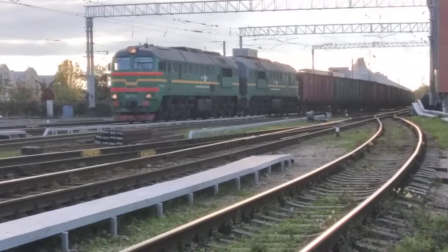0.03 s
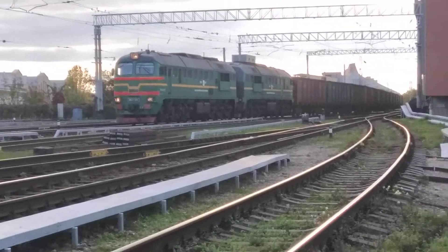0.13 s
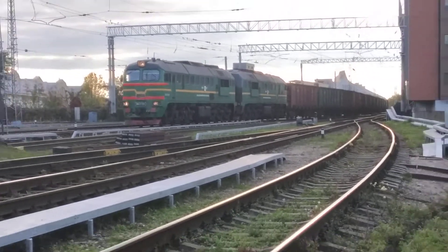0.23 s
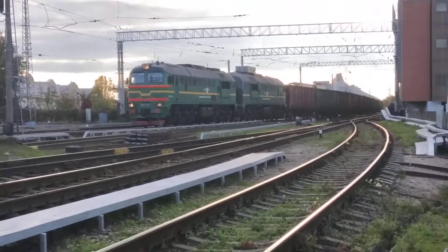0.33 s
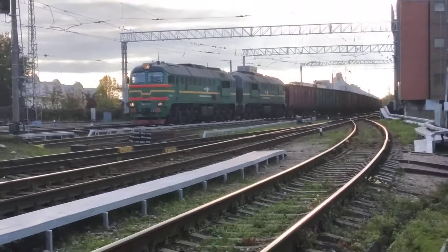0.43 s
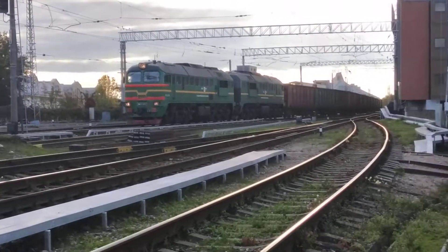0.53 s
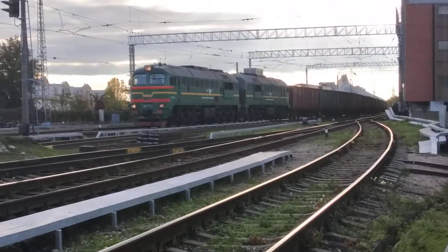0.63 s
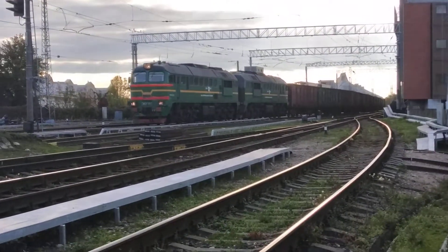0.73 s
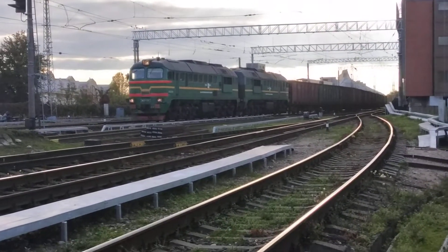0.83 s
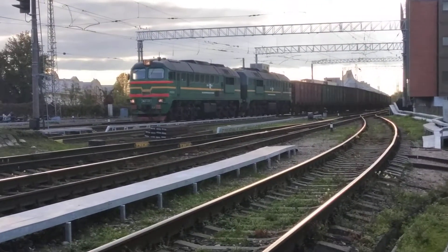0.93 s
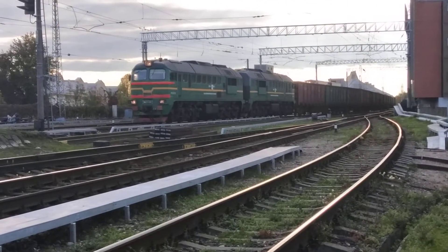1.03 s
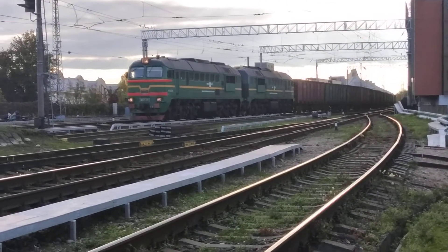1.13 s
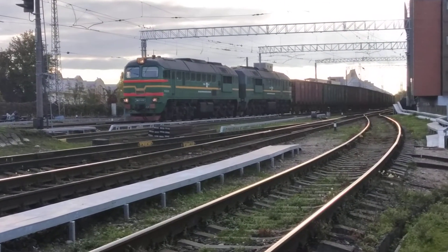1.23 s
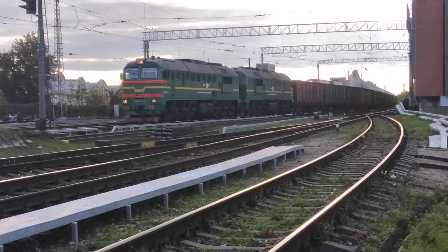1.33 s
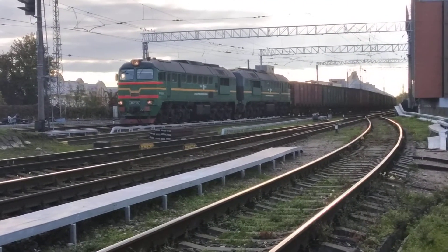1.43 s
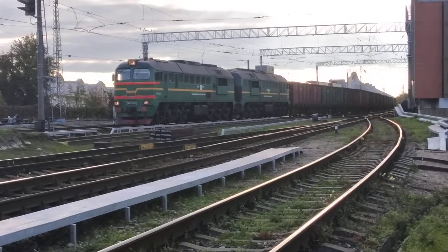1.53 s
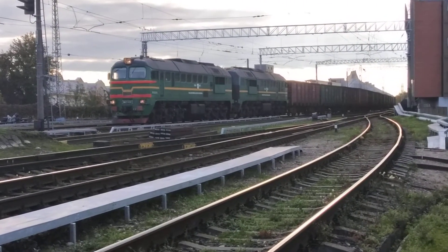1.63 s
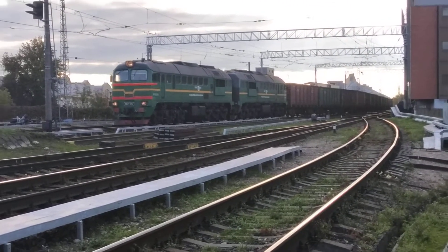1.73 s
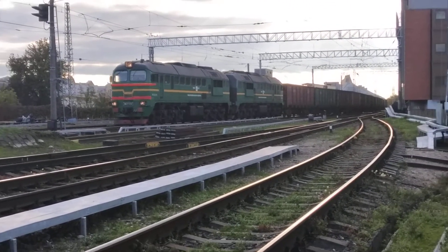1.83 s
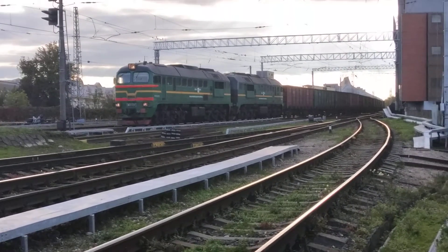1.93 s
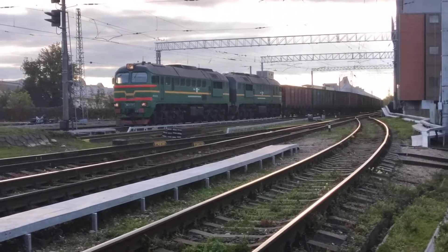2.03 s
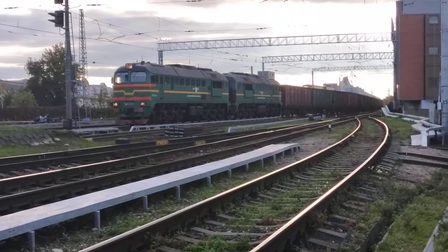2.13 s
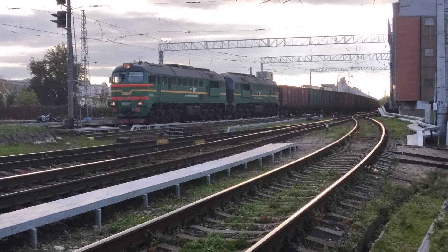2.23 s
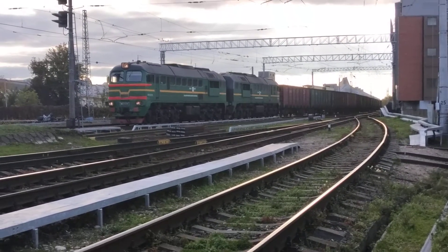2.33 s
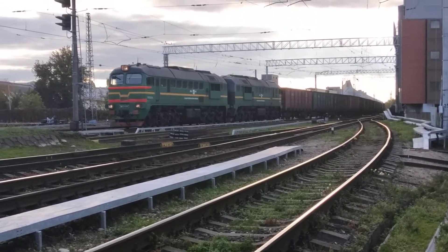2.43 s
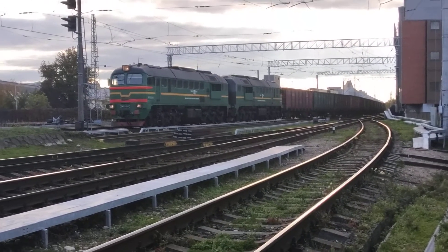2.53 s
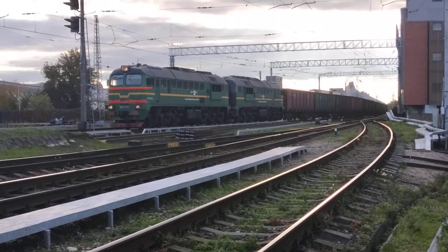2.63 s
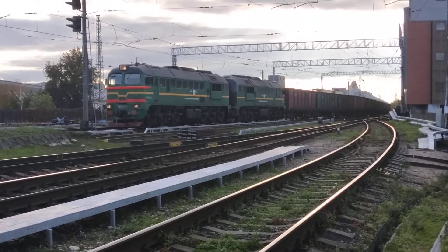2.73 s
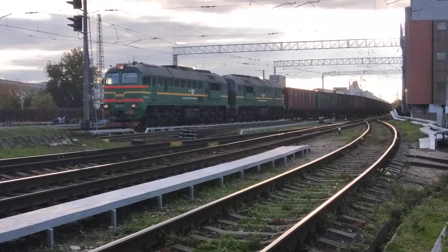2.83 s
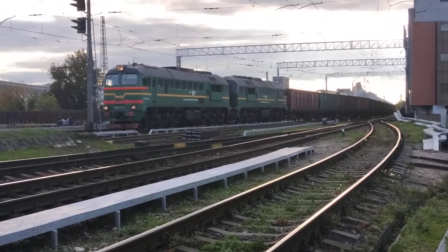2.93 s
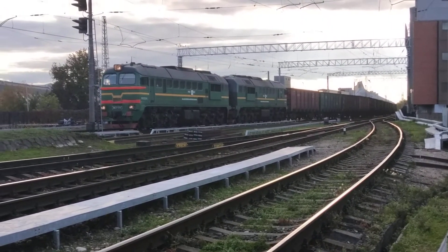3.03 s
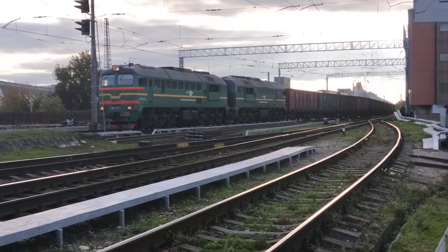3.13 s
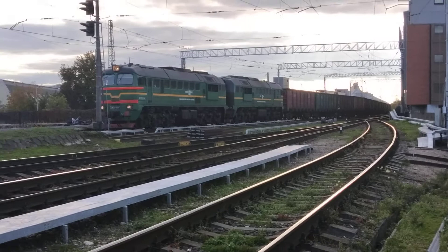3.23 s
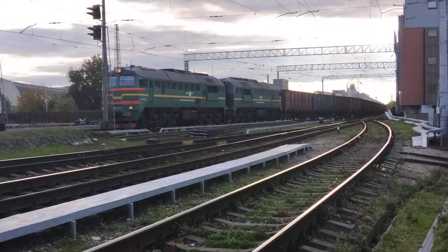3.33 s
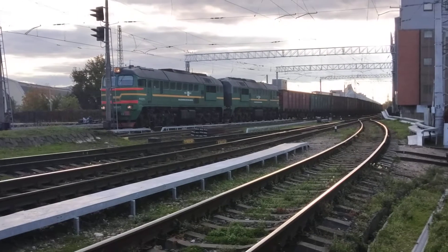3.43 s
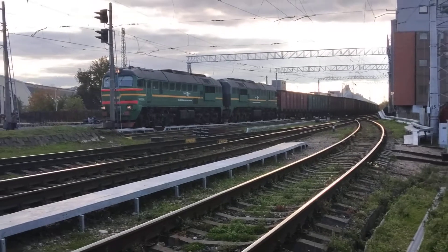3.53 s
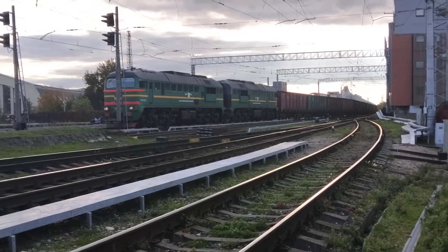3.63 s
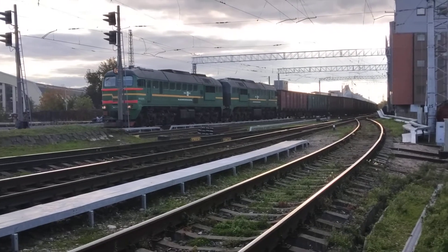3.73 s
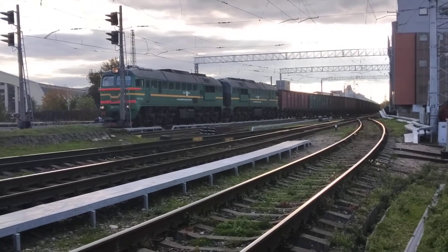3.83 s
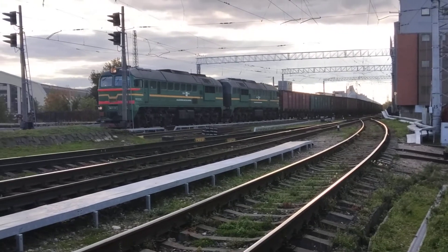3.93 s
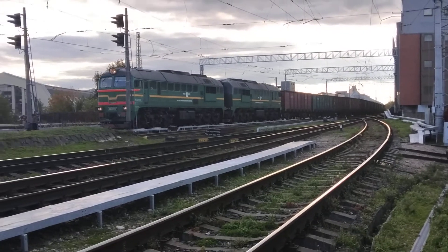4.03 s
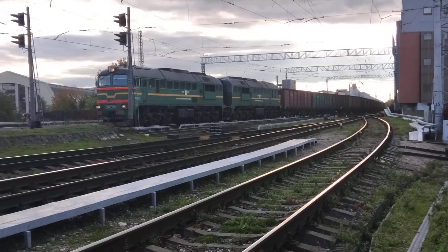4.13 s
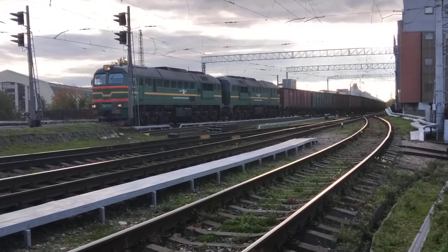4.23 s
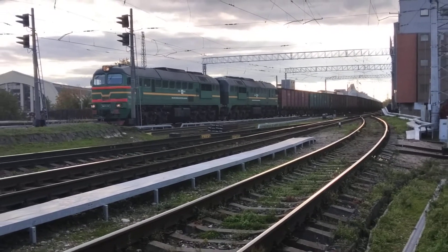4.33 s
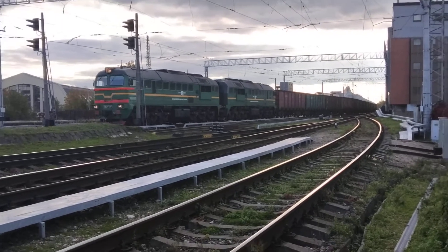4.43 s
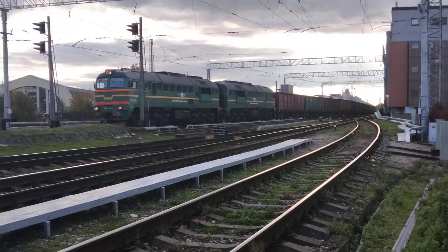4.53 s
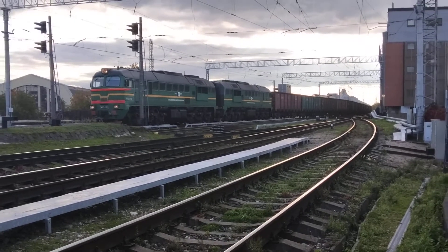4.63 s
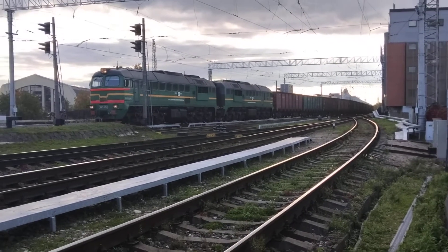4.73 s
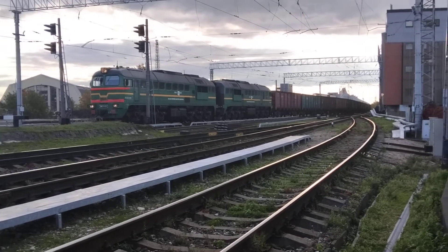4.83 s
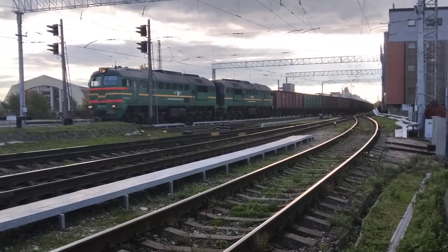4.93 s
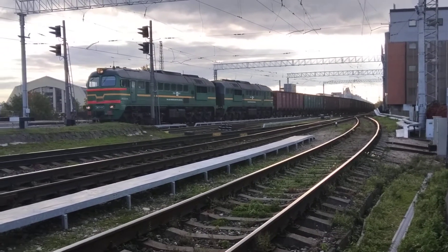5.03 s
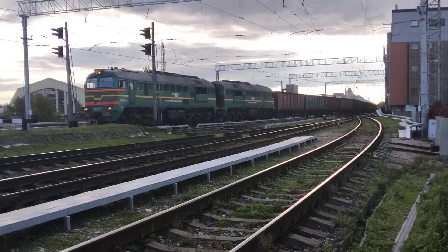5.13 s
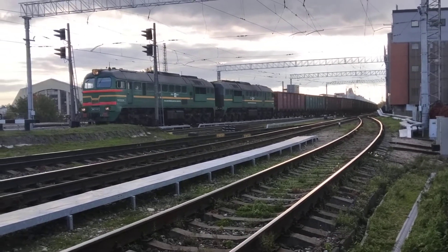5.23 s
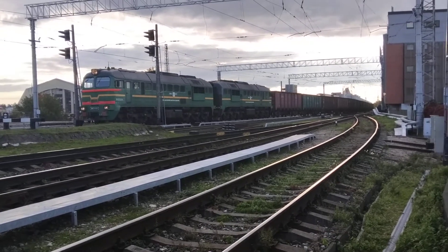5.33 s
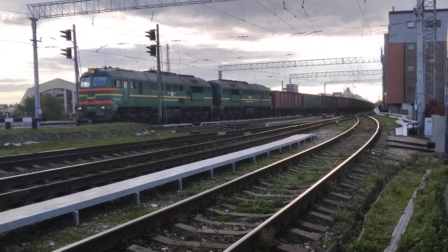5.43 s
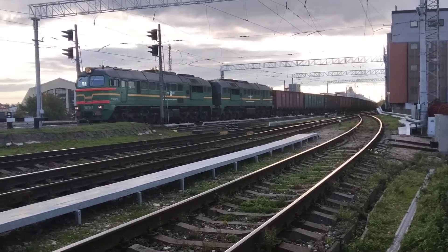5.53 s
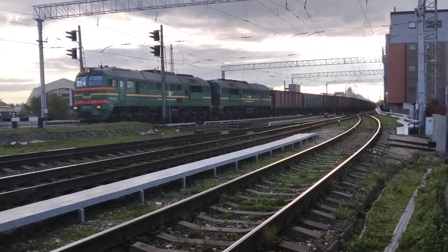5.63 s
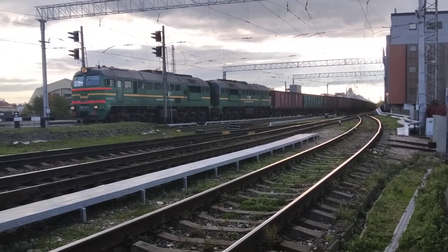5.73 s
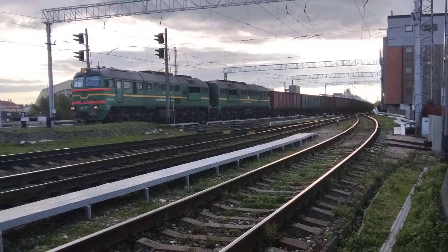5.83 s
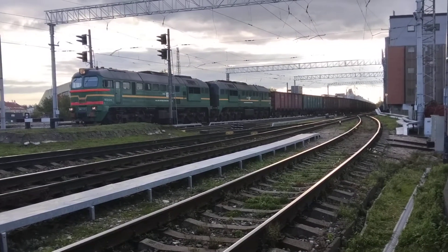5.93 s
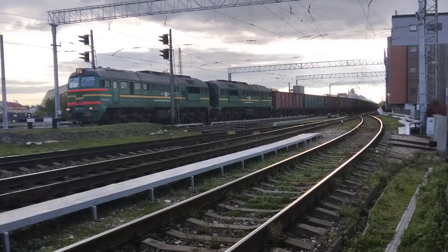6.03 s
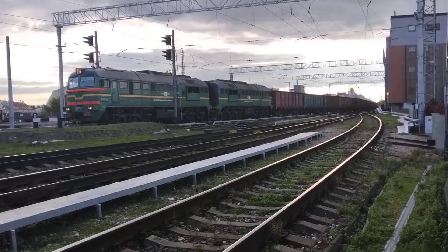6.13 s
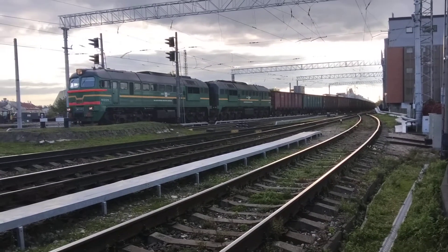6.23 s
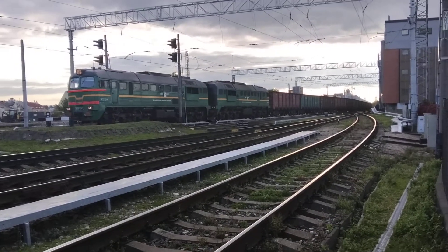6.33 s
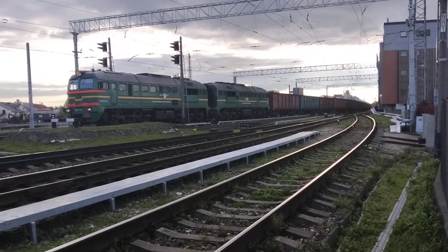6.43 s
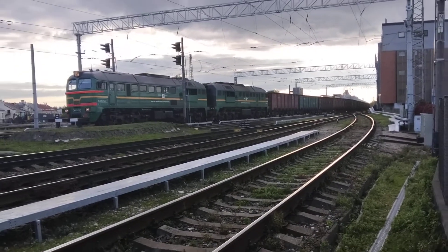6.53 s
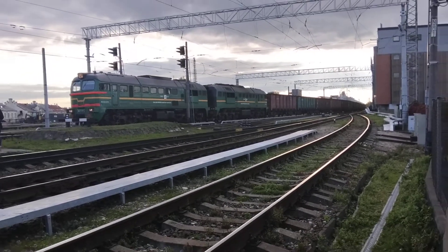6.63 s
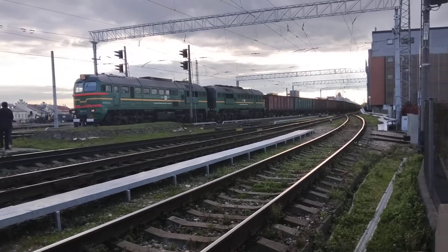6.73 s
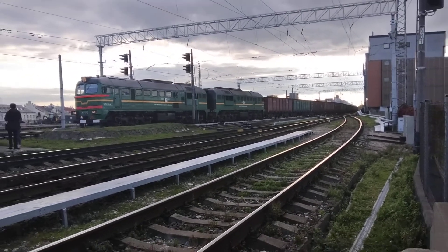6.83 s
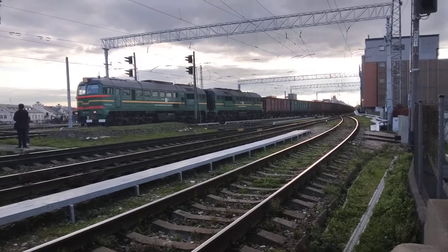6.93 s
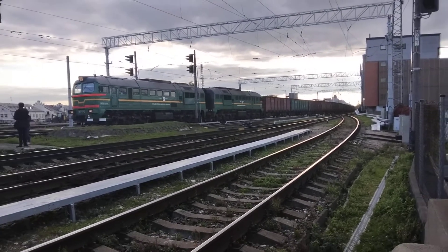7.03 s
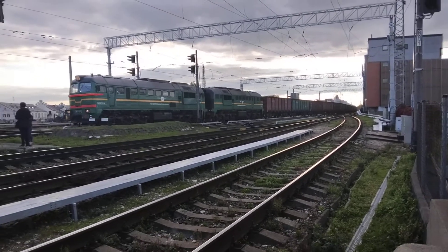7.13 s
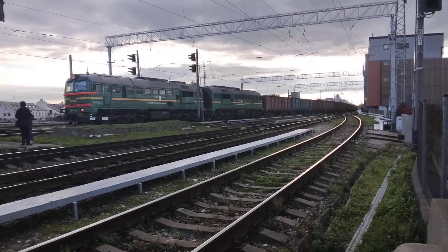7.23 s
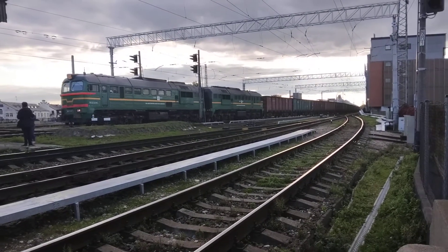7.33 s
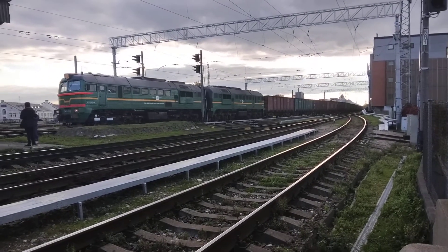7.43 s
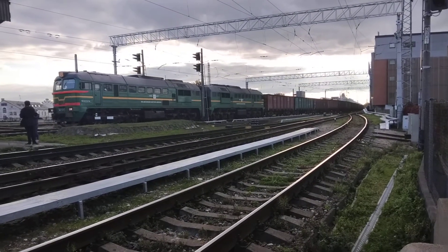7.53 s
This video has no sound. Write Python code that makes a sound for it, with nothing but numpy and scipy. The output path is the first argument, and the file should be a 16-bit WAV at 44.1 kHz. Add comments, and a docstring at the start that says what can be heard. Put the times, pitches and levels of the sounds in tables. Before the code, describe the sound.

A heavy diesel locomotive in two sections rolls slowly closer through an open station yard, heard from beside the track in stereo. From 0 s a very deep, lumpy exhaust throb is already present, roughly seven cycles a second with many blows in each; the front engine hunts gently in speed against the steady rear, making a slow beating. Under it are low wheel rumble, a soft mid roar, faint hums and a wavering gear whine around 770 Hz. Small clanks and steel rattles from joints and couplings scatter throughout, beginning near 0.4 s. A brief flange squeak sounds at 1.9 s. From 3 s the throb is clearly fuller, with a stronger clatter at 4.3 s. Thin faint squeals pass around 5.2-5.7 s, a tiny air puff at 6.4 s, a sharp clatter at 6.7 s, and dull thuds near 7.5 s. The front engine is loudest at the 7.6 s cut.

```python
"""Two twelve-cylinder engines throb through their exhausts as a two-section diesel locomotive nears with wagons.
It rolls slowly across a station yard; the front engine hunts in speed, the rear runs even, so they beat.
Exhaust: cylinder pulses into pipe resonances. Gear whine, hums, squeak, squeals: wavering sines.
Rolling, clatter, thuds, air puff: coloured stereo noise, in bursts for the jolts and the puff."""
import sys
import numpy as np
from scipy import signal
from scipy.fft import rfft, irfft
from scipy.io import wavfile

SR = 44100
rng = np.random.default_rng(int(sys.argv[2]) if len(sys.argv) > 2 else 0)


def log_audio(samples):
    """Write samples as a 16-bit WAV file to the path given in sys.argv[1]."""
    # one column per channel
    frames = np.atleast_2d(samples).T
    # limit to full scale, then quantise
    limited = np.clip(frames, -1, 1)
    pcm = np.round(limited * 32767).astype(np.int16)
    wavfile.write(sys.argv[1], SR, pcm)


N = 335160
TIME = np.arange(N) / SR
RUN_IN_SAMPLES = SR // 2

# Front crank speed, hunting: time_s, speed_turns_per_s
FRONT_SPEED = [(0, 6.8386), (0.391, 6.5679), (1.398, 6.9781), (2.052, 6.6063), (3.116, 6.944),
               (3.779, 6.6304), (4.864, 6.8922), (5.775, 6.7394), (6.888, 6.8763), (7.6, 6.7442)]
# Rear crank speed, sagging evenly: time_s, speed_turns_per_s
REAR_SPEED = [(0, 6.7307), (7.6, 6.6957)]
# Front cylinder blows leaving the manifold: crank_angle_deg, relative_strength_db
FRONT_BLOWS = [(13.6, 2.9), (49.0, 4.9), (62.9, 1.7), (101.5, 4.6), (128.7, 4.5), (161.3, 7.9),
               (191.3, 9.4), (224.8, 12.3), (253.7, 5.2), (262.1, -3.9), (289.8, 5.5), (341.0, 6.3)]
# Rear cylinder blows leaving the manifold: crank_angle_deg, relative_strength_db
REAR_BLOWS = [(28.8, -1.3), (45.6, -10.2), (68.5, -10.6), (97.4, -0.6), (105.2, -11.4), (142.0, -5.0),
              (164.4, -7.6), (218.5, -0.8), (251.3, -4.5), (270.8, 0.0), (287.2, -5.1), (324.1, -5.3)]
# Exhaust pipe resonances: centre_hz, width_hz, relative_gain_db
PIPE_RESONANCES = [(14.8, 19.2, 38.6), (63.2, 8.6, 36.9), (94.0, 8.3, 33.0), (119.2, 12.3, 28.4)]
# Nearness of the engines: time_s, front_relative_db, rear_relative_db
NEARNESS = [(0, -4, -7.5), (1, -3, -5), (1.9, -3.5, -4.5), (3.5, 0.7, 1.5), (5.001, 3, 1), (6.7, 5.5, 3),
            (7.6, 8, -1.5)]
# Share of the boom resonance added to each exhaust, negative subtracts: time_s, front_share, rear_share
BOOM_SHARES = [(0, 0.32, 0.75), (3, 0.25, 0.31), (7.6, -0.39, 0.13)]
# Front gear whine: time_s, level_db
FRONT_WHINE = [(0, -44.5), (.5, -50), (1.4, -41.5), (2.6, -42.5), (3.2, -38.5), (4, -44.5), (4.7, -37),
               (5.6, -39), (6.9, -45), (7.3, -35), (7.6, -44.5)]
# Hum pitches: pitch_hz
HUM_HZ = [78.5, 173.7, 1294]
# Hum levels: time_s, first_level_db, second_level_db, third_level_db
HUM_LEVELS = [(0, -32.5, -59, -67.5), (2, -45, -44.5, -70), (3.5, -32.5, -35.5, -51.5),
              (5.3, -35, -38, -50.5), (6, -39.5, -37, -59), (7.6, -48.5, -46, -48)]
# Rolling rumble spectrum: frequency_hz, relative_density_db
RUMBLE_SPECTRUM = [(20, -22), (40, -15.5), (80, -10), (125, -12), (140, -15.5), (152, -10.5), (164, -19),
                   (190, -22), (330, -26), (380, -29.5), (440, -54.5)]
# Rolling groan spectrum: frequency_hz, relative_density_db
GROAN_SPECTRUM = [(320, -20), (390, -3), (460, -3), (540, -3.5), (620, -28.5)]
# Rolling drone spectrum: frequency_hz, relative_density_db
DRONE_SPECTRUM = [(450, -26), (550, -7), (690, -2.5), (860, -6), (950, -31), (1100, -29.5)]
# Rolling roar spectrum: frequency_hz, relative_density_db
ROAR_SPECTRUM = [(700, -15.5), (900, -1.5), (990, -4), (1330, -2), (1530, -6.5), (1940, -7.5), (2400, -11),
                 (2820, -11.5), (3290, -9), (3740, -14.5), (4220, -15), (4600, -20), (4900, -18.5),
                 (5500, -22), (6410, -21.5), (6950, -31), (7400, -45)]
# High hiss spectrum, also the treble of jolts: frequency_hz, relative_density_db
HISS_SPECTRUM = [(6400, -24), (7100, 3), (8000, 2.5), (8700, -12.5), (10000, 0.5), (10800, -2),
                 (11600, -14), (13000, -19), (15000, -21.5), (15700, -21)]
# High hiss level: time_s, level_db
HISS_LEVEL = [(0, -78), (2.8, -77.5), (3.15, -67.5), (4.4, -72.5), (5.3, -64), (5.7, -66), (6.8, -64),
              (7.3, -68.5), (7.6, -63)]
# Wheels over joints, and couplings: start_s, nominal_peak_db, treble_relative_db, clank_relative_db, hold_s
JOLTS = [(0.35, -27.5, -22, -6, 0.05), (0.431, -33.5, -15, -17, 0.027), (0.728, -35.5, -19, 0, 0.067),
         (1.122, -31.5, -20, -10, 0.037), (1.165, -34.5, -15, 2, 0.044), (1.895, -29, -48, 0.5, 0.068),
         (2.213, -31, -22, -15, 0.018), (2.272, -29.5, -20, -14, 0.025), (2.606, -33, -17, -3, 0.06),
         (2.915, -36.5, -14, 7, 0.07), (2.987, -30.5, -28, -6, 0.055), (3.125, -33.5, -17, -13, 0.092),
         (3.304, -30, -28, 2.5, 0.021), (3.356, -35, -33, 3, 0.093), (3.717, -36, -12, -7, 0.023),
         (3.75, -29, -40, -13, 0.025), (3.995, -29, -41, -14, 0.051), (4.052, -30.5, -38, -9, 0.028),
         (4.329, -23.5, -52, -6, 0.062), (4.636, -33, -33, -6, 0.03), (4.807, -31.5, -16, 1, 0.022),
         (5, -32, -43, 2, 0.065), (5.268, -32.5, -28, 0, 0.022), (5.604, -31.5, -29, -12, 0.048),
         (6.681, -22, -18, -8, 0.015), (7.02, -32.5, -17, 2, 0.038), (7.426, -39, -25, 10, 0.024),
         (7.475, -26, -36, -21, 0.017)]
# Steel of wheels and bogies, shaken by jolts: centre_hz, width_hz, relative_gain_db
STEEL_RESONANCES = [(1770, 160, 0), (2700, 120, -3), (3300, 160, -2), (4200, 200, -2), (5500, 400, -10),
                    (6400, 300, -7)]
# Low clank spectrum: frequency_hz, relative_density_db
CLANK_SPECTRUM = [(700, -32.0), (900, 1), (2000, -5.5), (2400, -28.5)]
# Shaking that drives the steel: frequency_hz, relative_density_db
SHAKING_SPECTRUM = [(1200, -24), (1600, 0), (6800, -10), (7300, -24)]
# Dull thuds through the track: start_s, level_db
THUDS = [(.352, -35), (2.64, -36), (3.75, -38), (5.89, -36), (6.35, -32), (7.45, -33), (7.55, -27)]
# Thud spectrum: frequency_hz, relative_density_db
THUD_SPECTRUM = [(150, -20.5), (200, -3.5), (330, -3.5), (450, -17.5)]
# Flange squeak partials: multiple_of_fundamental, level_db
SQUEAK_PARTIALS = [(1, -39), (2, -46), (3.07, -47), (3.8, -52), (4.75, -52)]
# Faint flange squeals: start_s, hold_s, pitch_hz, left_db, right_db
SQUEALS = [(5.2, .5, 3860, -60.5, -58), (5.35, .33, 3140, -59, -60)]
# Air puff spectrum: frequency_hz, relative_density_db
PUFF_SPECTRUM = [(7500, -12), (9000, -7.5), (10000, 0), (11200, -6), (12500, -13), (15700, -17)]
# Left-right likeness of noise: frequency_hz, correlation_ratio
LIKENESS = [(60, .9), (110, 1), (190, 1), (350, .75), (620, 1), (1120, 0.57), (2010, 0.15), (3600, 0.2),
            (6470, 0.25)]
# Left-right balance of noise: frequency_hz, left_minus_right_db
LEAN = [(60, 0.5), (250, 1), (520, -3), (1000, -1), (1600, -4), (2200, 6), (3150, 0.5), (4500, 8),
        (6500, 11.5), (7300, 9.5), (9000, -18), (12000, -7.5)]
# Phase by which the left leads in noise: frequency_hz, lead_rad
LEAD = [(0, 0), (860, 1), (1290, 1.17), (1550, 4), (2240, -1.34), (2760, -2), (3190, -1.5), (3700, -2.5),
        (4220, -7), (5250, -5.5), (5860, -8), (6630, -13.6)]

CRANK_START_DEG, UNEVEN_DB, SILENCER_HZ = 5.5, .45, 125
PIPE_RING_HZ, PIPE_RING_WIDTH_HZ, PIPE_RING_SHARE = 148, 8, .36
BOOM_HZ, BOOM_WIDTH_HZ = 40.6, 3
ENGINE_DB, BASS_CUT_HZ = 1, 30
WHINE_MULTIPLE = 113.2  # of crank speed
REAR_WHINE_START_DB, REAR_WHINE_DB_PER_S = -51.5, 1.02
RUMBLE_START_DB, RUMBLE_DB_PER_S = -31.5, .45
GROAN_START_DB, GROAN_DB_PER_S = -56, 2.23
DRONE_START_DB, DRONE_DB_PER_S = -45.5, 1.23
ROAR_START_DB, ROAR_DB_PER_S = -45, .76
CREST_DB = 16.5  # nominal peak over rms
STRIKE_SHARE, STRIKE_FALL_S = .6, .006
SCRAPE_SHARE = .4  # unpitched noise beside the ringing steel
THUD_HOLD_S = .025
SQUEAK_START_S, SQUEAK_HOLD_S, SQUEAK_HZ = 1.886, .06, 880
PUFF_START_S, PUFF_RISE_S, PUFF_HOLD_S, PUFF_FALL_S, PUFF_DB = 6.39, .016, .055, .022, -55
TONE_LEAN_DB, TONE_LAG_S = -.8, -.00008  # left minus right
CUTOFF_HZ = 15700


def from_db(db):
    """Decibels to amplitude gain."""
    return 10 ** (np.asarray(db) / 20)


def rms_one(x):
    """Scale to unit rms."""
    return x / np.sqrt(np.mean(x ** 2) + 1e-20)


def in_time(rows):
    """Interpolate each column of a timed table at every sample."""
    time_s, *columns = np.transpose(rows)
    return [np.interp(TIME, time_s, column, left=column[0]) for column in columns]


def at_hz(points, hz):
    """Interpolate a spectrum on a log-frequency axis."""
    point_hz, values = np.array(points).T
    return np.interp(np.log(hz + 1), np.log(point_hz), values)


def growing(start_db, db_per_s):
    """Level in dB changing linearly with time."""
    return start_db + db_per_s * TIME


def drift(rate_hz):
    """Random drift of unit rms: white noise through two equal low-pass poles at rate_hz."""
    step = 40  # samples
    pole = np.exp(-2 * np.pi * rate_hz * step / SR)
    white = rng.standard_normal(N // step + 2002)
    slow = signal.lfilter([1], [1, -2 * pole, pole * pole], white)[2000:]
    return np.interp(np.arange(N) / step, np.arange(len(slow)), rms_one(slow))


def resonance(x, hz, width_hz):
    """Two-pole resonance with unit gain at its peak."""
    r = np.exp(-np.pi * width_hz / SR)
    numerator = (1 - r * r) / 2 * np.array([1, 0, -1])
    denominator = [1, -2 * r * np.cos(2 * np.pi * hz / SR), r * r]
    return signal.lfilter(numerator, denominator, x)


def resonance_bank(x, rows):
    """Parallel resonances summed with alternating sign."""
    return sum((-1) ** k * from_db(db) * resonance(x, hz, width_hz)
               for k, (hz, width_hz, db) in enumerate(rows))


def swell(start_s, hold_s, rise_s=.003, fall_s=.022):
    """Linear rise, hold to hold_s after the start, exponential fall."""
    since_s = TIME - start_s
    rise = np.clip(since_s / rise_s, 0, 1)
    return rise * np.exp(-np.clip(since_s - hold_s, 0, None) / fall_s)


def noise(spectrum, patchy_db=0., flicker_hz=11.0):
    """Stereo noise with mid rms 1; overlapping half-octave bands flicker partly together."""
    hz = np.arange(N // 2 + 1) * SR / N
    mid, side = rfft(rng.standard_normal((2, N)))
    alike = np.clip(at_hz(LIKENESS, hz), -.99, .99)
    mid, side = np.sqrt(1 + alike) * mid, np.sqrt(1 - alike) * side
    lean = from_db(at_hz(LEAN, hz) / 2)
    lean = lean * np.exp(.5j * np.interp(hz, *np.transpose(LEAD)))
    pair = from_db(at_hz(spectrum, hz)) * np.array([(mid + side) * lean, (mid - side) / lean])
    half_octave = 2 * np.log2(hz + 1)
    low, high = 2 * np.log2([spectrum[0][0], spectrum[-1][0]])
    together, out = drift(14.0), 0
    for k in range(int(low), int(high) + 2):
        band = irfft(pair * np.clip(1 - abs(half_octave - k), 0, 1), N)
        out = out + band * from_db(patchy_db * (.36 * together + drift(flicker_hz)))
    return out / np.std(out.mean(axis=0))


def tone(cycles, level_db, waver_db=0., waver_hz=2.5):
    """Sine at a nominal rms level, wavering on its way through moving air."""
    gain = np.sqrt(2) * from_db(level_db + waver_db * drift(waver_hz))
    return gain * np.sin(2 * np.pi * (cycles + rng.random()))


def crank(speed):
    """Crank turns: integrated speed, including a run-in before time zero."""
    time_s, turns_per_s = np.transpose(speed)
    turns = np.cumsum(np.interp(np.arange(-RUN_IN_SAMPLES, N) / SR, time_s, turns_per_s)) / SR
    return turns - turns[RUN_IN_SAMPLES] + CRANK_START_DEG / 360


def exhaust(turns, blows):
    """Each cylinder blows once a turn, unevenly, into pipe resonances and the silencer low-pass."""
    pulses = np.zeros(len(turns))
    for angle_deg, strength_db in blows:
        at = np.flatnonzero(np.diff(np.floor(turns - angle_deg / 360)))
        pulses[at] += from_db(strength_db + UNEVEN_DB * rng.standard_normal(len(at)))
    piped = resonance_bank(pulses, PIPE_RESONANCES)
    silencer = signal.butter(4, SILENCER_HZ, fs=SR, output="sos")
    throb = signal.sosfilt(silencer, piped)[RUN_IN_SAMPLES:]
    return throb + PIPE_RING_SHARE * resonance(throb, PIPE_RING_HZ, PIPE_RING_WIDTH_HZ)


def exhausts():
    """Throb of both sections, scaled by nearness; the deepest bass does not carry."""
    low = 0
    sections = zip([FRONT_SPEED, REAR_SPEED], [FRONT_BLOWS, REAR_BLOWS], in_time(NEARNESS), in_time(BOOM_SHARES))
    for speed, blows, near_db, boom_share in sections:
        throb = exhaust(crank(speed), blows)
        boom = boom_share * resonance(throb, BOOM_HZ, BOOM_WIDTH_HZ)
        low = low + from_db(ENGINE_DB + near_db) * (throb + boom)
    bass_cut = signal.butter(4, BASS_CUT_HZ, "high", fs=SR, output="sos")
    return signal.sosfiltfilt(bass_cut, low)


def gear_whines():
    """Gear tones at a fixed multiple of each crank speed."""
    front_db, = in_time(FRONT_WHINE)
    rear_db = growing(REAR_WHINE_START_DB, REAR_WHINE_DB_PER_S)
    return sum(tone(WHINE_MULTIPLE * crank(speed)[RUN_IN_SAMPLES:], level_db, waver_db=1.5, waver_hz=7.6)
               for speed, level_db in [(FRONT_SPEED, front_db), (REAR_SPEED, rear_db)])


def hums():
    """Fixed-pitch tones not tied to the cranks."""
    return sum(tone(hz * TIME, level_db, waver_db=2.0, waver_hz=3.1)
               for hz, level_db in zip(HUM_HZ, in_time(HUM_LEVELS)))


def rolling():
    """Wheels on rails and engine-room roar: noise layers growing as the train nears, plus a varying hiss."""
    hiss_db, = in_time(HISS_LEVEL)
    rumble_gain = from_db(growing(RUMBLE_START_DB, RUMBLE_DB_PER_S))
    groan_gain = from_db(growing(GROAN_START_DB, GROAN_DB_PER_S))
    drone_gain = from_db(growing(DRONE_START_DB, DRONE_DB_PER_S))
    roar_gain = from_db(growing(ROAR_START_DB, ROAR_DB_PER_S))
    rumble = rumble_gain * noise(RUMBLE_SPECTRUM, patchy_db=1.3, flicker_hz=13.0)
    groan = groan_gain * noise(GROAN_SPECTRUM, patchy_db=2.2)
    drone = drone_gain * noise(DRONE_SPECTRUM, patchy_db=1.0, flicker_hz=6.0)
    roar = roar_gain * noise(ROAR_SPECTRUM, patchy_db=1.33)
    hiss = from_db(hiss_db) * noise(HISS_SPECTRUM, patchy_db=2.0, flicker_hz=22.0)
    return rumble + groan + drone + roar + hiss


def clatter():
    """Far jolts arrive as smeared bursts: low clank, rattling steel, a trace of treble."""
    clank_level, rattle_level, treble_level = np.zeros((3, N))
    for start_s, peak_db, treble_db, clank_db, hold_s in JOLTS:
        strike = STRIKE_SHARE * swell(start_s, 0, rise_s=.001, fall_s=STRIKE_FALL_S)
        shape = from_db(peak_db - CREST_DB) * (swell(start_s, hold_s) + strike)
        clank_level += from_db(clank_db) * shape
        rattle_level += shape
        treble_level += from_db(treble_db) * shape
    clank = noise(CLANK_SPECTRUM)
    shaking = noise(SHAKING_SPECTRUM, patchy_db=1.5, flicker_hz=61.0)
    ringing = resonance_bank(shaking, STEEL_RESONANCES)
    rattle = ringing / np.std(ringing.mean(axis=0)) + SCRAPE_SHARE * shaking
    treble = noise(HISS_SPECTRUM, patchy_db=5.0, flicker_hz=18.0)
    return clank_level * clank + rattle_level * rattle + treble_level * treble


def thuds():
    """Dull thuds through the track: short bursts of low noise."""
    level = sum(from_db(db) * swell(start_s, THUD_HOLD_S) for start_s, db in THUDS)
    return level * noise(THUD_SPECTRUM)


def squeak():
    """A flange slips on the rail for a moment: a short stack of wavering partials."""
    stack = sum(tone(multiple * SQUEAK_HZ * TIME, level_db, waver_db=3, waver_hz=40)
                for multiple, level_db in SQUEAK_PARTIALS)
    return swell(SQUEAK_START_S, SQUEAK_HOLD_S, rise_s=.012, fall_s=.012) * stack


def squeals():
    """Thin unsteady flange tones, opposite in polarity between the channels."""
    out = 0
    for start_s, hold_s, hz, left_db, right_db in SQUEALS:
        shape = swell(start_s, hold_s, rise_s=.03, fall_s=.03)
        gains = from_db([[left_db], [right_db]]) * [[1], [-1]]
        out = out + shape * tone(hz * TIME, 0, waver_db=7.0, waver_hz=12.0) * gains
    return out


def air_puff():
    """Compressed air escapes a valve: one burst of high noise."""
    shape = swell(PUFF_START_S, PUFF_HOLD_S, rise_s=PUFF_RISE_S, fall_s=PUFF_FALL_S)
    return from_db(PUFF_DB) * shape * noise(PUFF_SPECTRUM)


def scene():
    """Sum all sources; engine tones, hums and squeak reach the left sooner, the right louder."""
    tones = exhausts() + gear_whines() + hums() + squeak()
    pair = [from_db(side * TONE_LEAN_DB) * np.interp(TIME - side * TONE_LAG_S, TIME, tones)
            for side in (.5, -.5)]
    return np.array(pair) + rolling() + clatter() + thuds() + squeals() + air_puff()


def record(dry):
    """Round the peaks by tanh, then cut the top with an elliptic low-pass."""
    rounded = 2.2 * np.tanh(dry / 2.2)
    top_cut = signal.ellip(10, .5, 70, CUTOFF_HZ, fs=SR, output="sos")
    return signal.sosfilt(top_cut, rounded)


dry = scene()
out = record(dry)
log_audio(out)
```